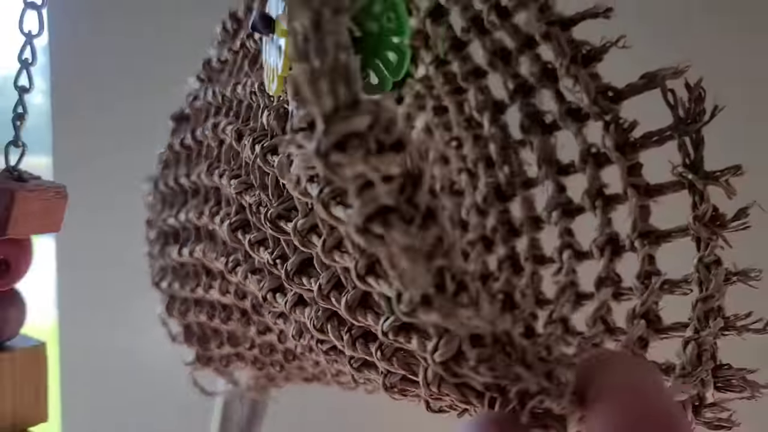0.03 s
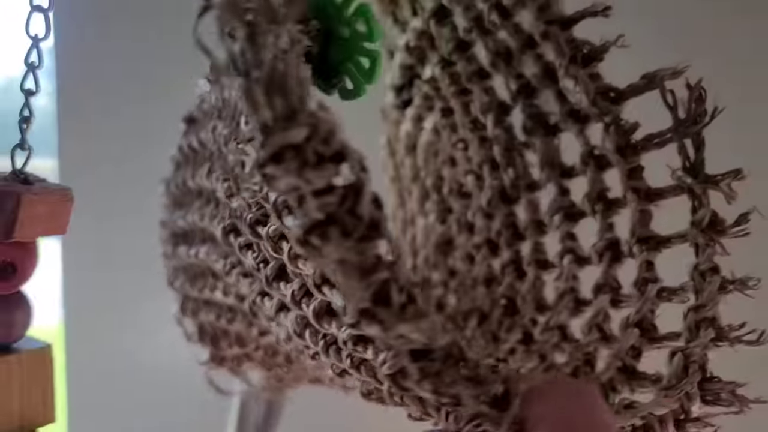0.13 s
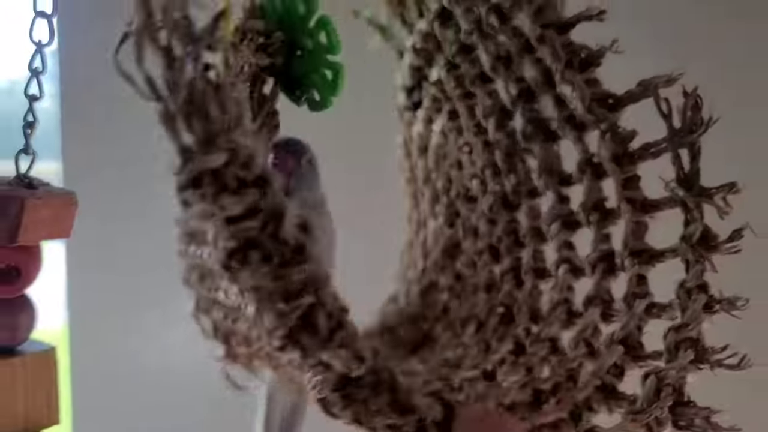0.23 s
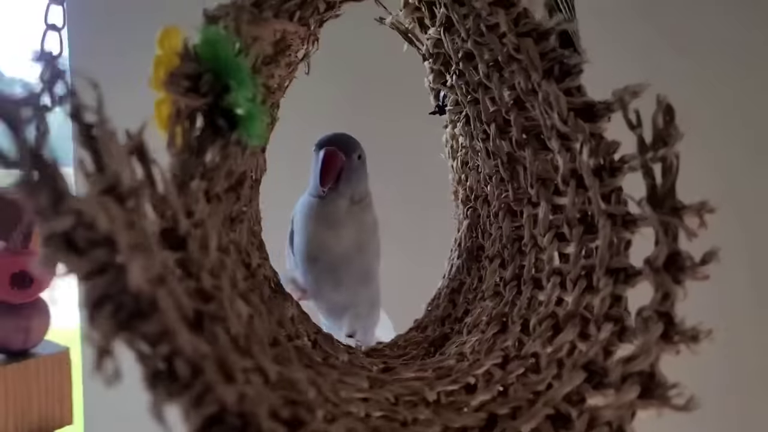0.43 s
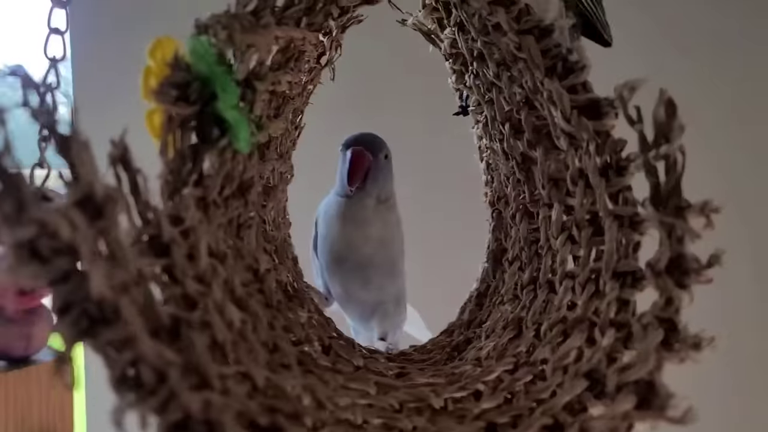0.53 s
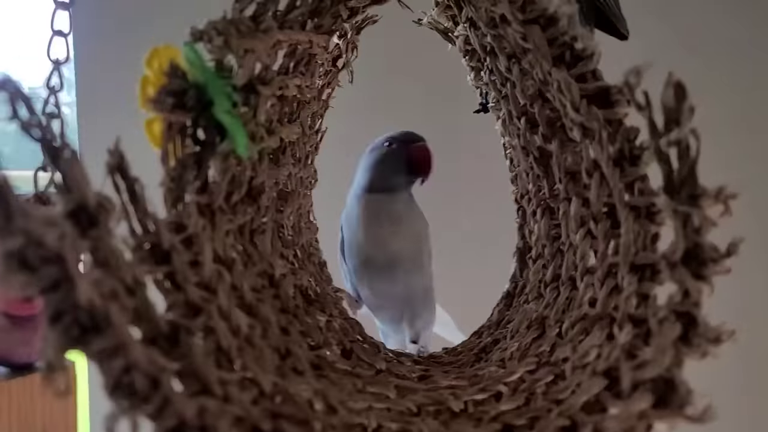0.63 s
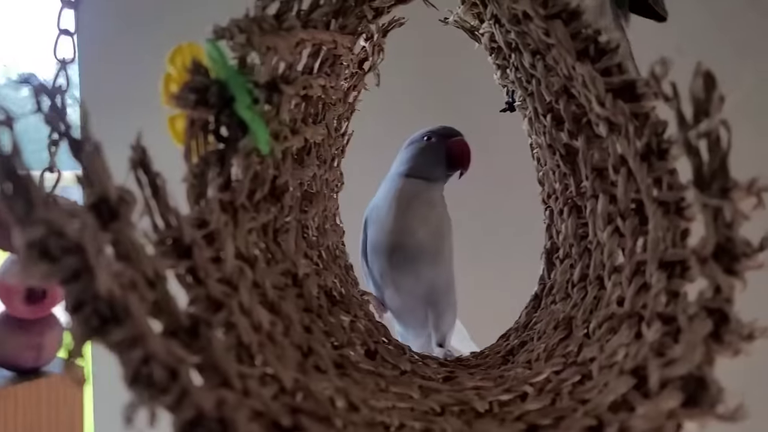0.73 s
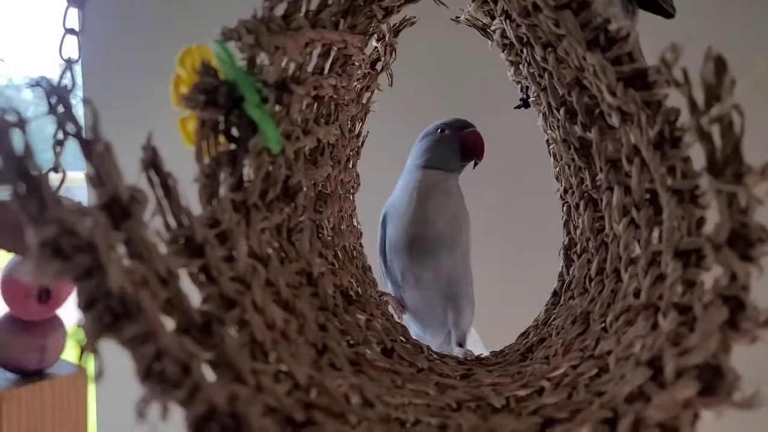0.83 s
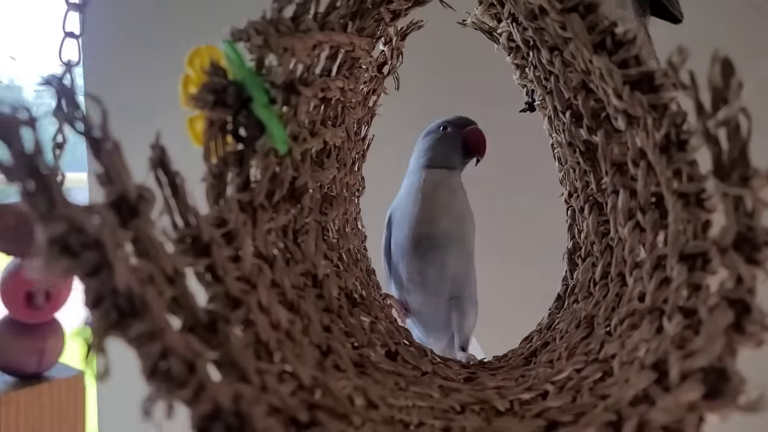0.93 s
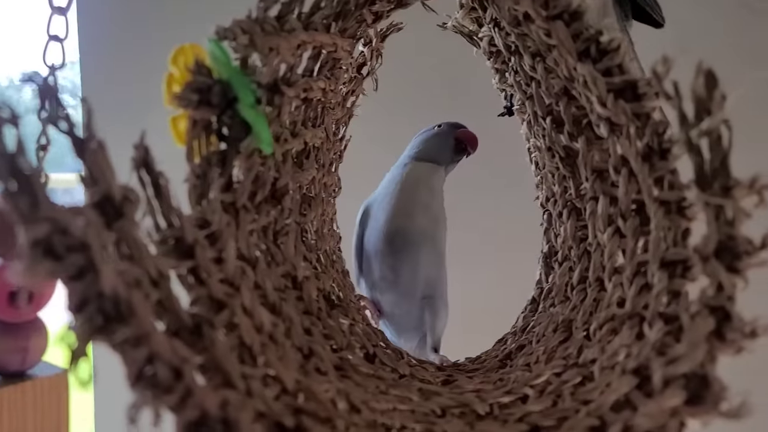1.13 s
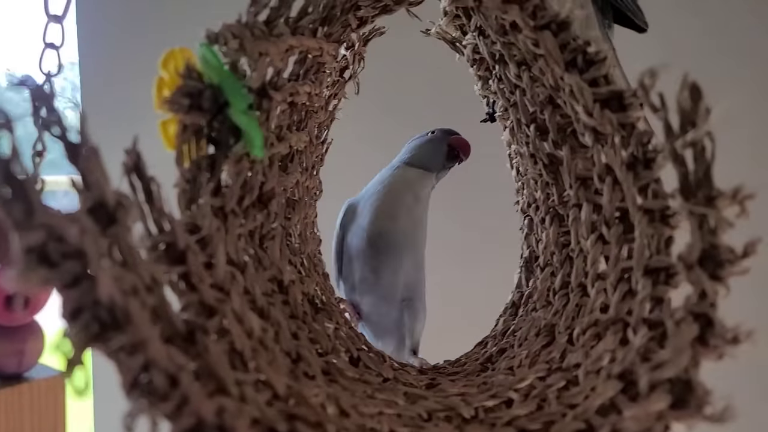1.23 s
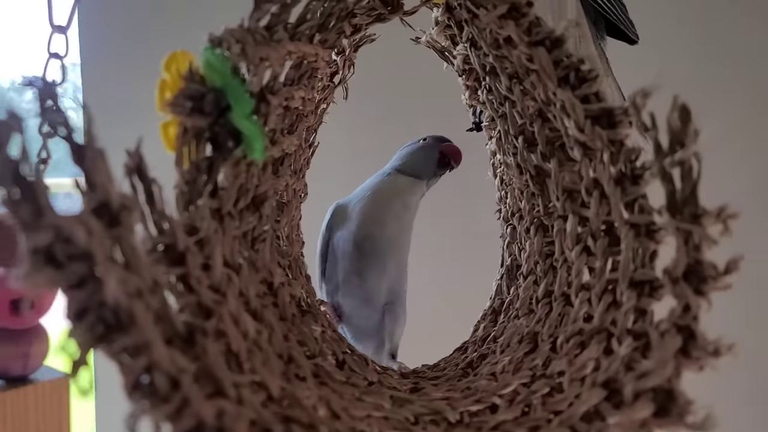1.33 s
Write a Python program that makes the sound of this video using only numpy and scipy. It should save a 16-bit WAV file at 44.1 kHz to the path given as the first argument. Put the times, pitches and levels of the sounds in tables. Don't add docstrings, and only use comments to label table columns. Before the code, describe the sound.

A parakeet squawks twice in an echoing room, first loud and harsh, then softer and lower.

```python
import sys
import numpy as np
from scipy import signal
from scipy.fft import rfft, irfft
from scipy.io import wavfile
from scipy.ndimage import uniform_filter1d

SR = 44100
rng = np.random.default_rng(int(sys.argv[2]) if len(sys.argv) > 2 else 0)


def magnitude_from_level(level_db):
    exponent = np.asarray(level_db, float) / 20
    return 10 ** exponent


def to_wav(s):
    ch = np.atleast_2d(s).T
    pcm = np.round(np.clip(ch, -1, 1) * 32767)
    wavfile.write(sys.argv[1], SR, pcm.astype(np.int16))


N = 61739

# frequency in Hz, level in dB.
STRAND_THROAT = [(1500, -28.5), (2900, 12), (4400, -35), (6000, -14.5), (9000, -52)]


def evened(x):
    return x / np.sqrt(np.mean(x ** 2) + 1e-20)


def read(points, hz):
    f, value = np.transpose(points)
    return np.interp(np.log(hz + 1), np.log(f + 1), value)


def drift(top_hz, count=1):
    hz = np.fft.rfftfreq(N, 1 / SR)
    slow = rfft(rng.standard_normal((count, N))) / (1 + (hz / top_hz) ** 4)
    return evened(irfft(slow, N))


def hum():
    tone_hz = [148.3, 296.6, 62, 81]
    # level in dB, left minus right in dB.
    tone_levels = [(-66.5, -11.5), (-83, 2.2), (-63.5, -3), (-70, -2.5)]
    waver_db, waver_hz = 2, 1.9
    t = np.arange(N) / SR
    out = np.zeros((2, N))
    for hz, (db, pan_db) in zip(tone_hz, tone_levels):
        sides_db = np.array([[pan_db / 2], [-pan_db / 2]])
        level = np.sqrt(2) * magnitude_from_level(db + waver_db * drift(waver_hz)[0] + sides_db)
        out += level * np.sin(2 * np.pi * (hz * t + rng.random()))
    return out


def noise(colour, low_hz, high_hz, patchy_db):
    # frequency in Hz, left-right likeness from -1 to 1.
    likeness = [(40, 1), (100, 0.61), (200, 0.03), (350, -0.12), (700, -0.43), (1500, -0.23), (4000, 0.05)]
    hz = np.fft.rfftfreq(4096, 1 / SR)
    a, b, c, d, patches = rng.standard_normal((N // 1024 + 5, 2049, 5)).T
    patches = uniform_filter1d(patches, size=6, axis=0)
    patches = evened(uniform_filter1d(patches, size=3, axis=1))
    same = np.clip(read(likeness, hz), -1, 1)[:, None]
    left = a + 1j * b
    right = same * left + np.sqrt(1 - same ** 2) * (c + 1j * d)
    level = magnitude_from_level(read(colour, hz)[:, None] + patchy_db * patches)
    band = ((hz > low_hz) & (hz < high_hz))[:, None]
    z = np.array([left, right]) * level * band
    return evened(signal.istft(z, nperseg=4096, noverlap=3072)[1][:, :N])


def room_floor():
    # frequency in Hz, level in dB per Hz.
    rumble_colour = [(20, -23.5), (45, -13.5), (70, -3), (110, -8.5), (160, -13), (200, -23), (400, -21.5),
                     (480, -27.5), (700, -21), (950, -38)]
    # frequency in Hz, level in dB per Hz.
    hiss_colour = [(900, -4.5), (1300, -5.5), (3800, -11.5), (7100, -11.5), (8000, -24.5), (12000, -16.5),
                   (14800, -20.5), (15700, -33)]
    rumble = magnitude_from_level(-59) * noise(rumble_colour, 15, 950, patchy_db=3.5)
    hiss = magnitude_from_level(-74.5) * noise(hiss_colour, 950, 17000, patchy_db=0.43)
    return rumble + hiss


def call(curve, throat, rasp, rasp_db, flutter):
    wobble, wobble_hz, shimmer = 0.03, 160, 0.9
    flutter_hz, flutter_bend = 258.3, -0.023
    blur_hz, breath = 380, 1.3
    throb_hz, throb_db = 35, 1
    t = np.arange(N) / SR
    s, pitch, effort_db, rough = np.transpose(curve)
    hz = np.interp(t, s, pitch)
    rough = np.clip(np.interp(t, s, rough), 0, 1)
    sway, shake, beat = drift(wobble_hz, count=3)

    flap = 2 * np.pi * np.cumsum(flutter_hz * (1 + 0.11 * beat)) / SR
    turn = 2 * np.pi * np.cumsum(hz * (1 + wobble * rough * sway)) / SR
    turn = turn + flutter_bend * flutter * np.sin(flap)
    tone = sum(magnitude_from_level(read(throat, k * hz)) * np.cos(k * turn) for k in range(1, 7))

    gusts = drift(blur_hz, count=10)
    smeared = evened(sum(gust * np.cos(k * turn) for k, gust in enumerate(gusts, 1)))
    air = smeared + breath * rng.standard_normal(N)
    air = evened(irfft(rfft(air) * magnitude_from_level(read(rasp, np.fft.rfftfreq(N, 1 / SR))), N))

    voice = np.sqrt(2) * tone * (1 + shimmer * rough * shake) + magnitude_from_level(rasp_db) * 2 * rough * air
    push = magnitude_from_level(np.interp(t, s, effort_db, -200, -200) + throb_db * drift(throb_hz)[0])
    return push * (1 + flutter * np.cos(flap)) * voice


def loud_squawk():
    # time in seconds, pitch in Hz, effort in dB, roughness 0-1.
    main = [(.19, 1400, -67.5, .6), (.215, 1599, -44, 0.71), (.252, 1700, -26.5, 0.29), (.31, 1702, -21, 0),
            (.322, 1551, -25.5, 0.42), (.334, 1538, -28, 0), (.362, 1480, -20.5, 0.23),
            (.385, 1560, -54, 0.4), (.42, 1556, -60, .6)]
    croak = [(.33, 1040, -53.5, 0.6), (.345, 1032, -34.5, .5), (.39, 1043, -43.5, 0.62),
             (.43, 1018, -37.5, 0.65), (.46, 1020, -92, 0.3)]
    yelp = [(.203, 1855, -61.5, 0.77), (.212, 1741, -34.5, 0), (.225, 1561, -39, 0.3),
            (.24, 1542, -43.5, .4), (.255, 1750, -81, 0.1)]
    strand = [(.27, 1616, -61.5, 0.54), (.295, 1580, -28.5, 0.36), (.315, 1526, -35.5, 0),
              (.33, 1439, -43, .3), (.37, 1424, -43, 0.36), (.4, 1296, -71, .4)]
    # frequency in Hz, level in dB.
    main_throat = [(1000, -70), (1600, -46.5), (3200, 0), (3450, -8.5), (4600, -49.5), (5100, -43.5),
                   (6500, -26), (10000, -45.5)]
    croak_throat = [(1000, -69), (2100, -7.5), (3100, -19.5), (4200, -5), (5200, -17.5), (6200, -11.5),
                    (7500, -38.5), (10000, -55)]
    yelp_throat = [(1300, -6.5), (1650, -5.5), (3200, -32), (5000, -6.5), (6500, -24.5), (10000, -50)]
    rasp_colour = [(1150, -38), (1400, -18), (2300, 0), (3200, -4), (4600, -10), (6300, -18.5),
                   (9600, -18.5), (11500, -37.5)]
    parts = [(main, main_throat), (croak, croak_throat), (yelp, yelp_throat), (strand, STRAND_THROAT)]
    return sum(call(curve, throat, rasp_colour, rasp_db=-7, flutter=0.41) for curve, throat in parts)


def ticks():
    # start in seconds, peak in dB, pitch scale, ring in seconds (time to fall 20 dB).
    snaps = [(.4568, -33, 1., .0013), (.624, -46, 1.1, .0009), (.662, -54, .95, .002),
             (1.109, -64, .8, .0009), (1.157, -66, .9, .0008), (1.184, -64, .65, .001),
             (1.2752, -59, .5, .0015), (1.278, -57, .35, .0035), (1.2845, -63, .38, .0015),
             (1.292, -66, .35, .002), (1.318, -66, .35, .0025)]
    # frequency in Hz, level in dB.
    straw_modes = [(3000, -14), (5800, -5), (9000, 0), (12000, -2), (14300, -7)]
    out = np.zeros(N + 600)
    t = np.arange(600) / SR
    for s, db, scale, ring in snaps:
        snap = np.zeros(600)
        for hz, mode_db in straw_modes:
            snap += magnitude_from_level(mode_db) * np.sin(2 * np.pi * np.minimum(hz * scale, SR / 3) * t)
        out[round(s * SR):][:600] += magnitude_from_level(db - 20 * t / ring) * snap
    return out[:N]


def soft_squawk():
    # time in seconds, pitch in Hz, effort in dB, roughness 0-1.
    main = [(.54, 1290, -46, 0.28), (.585, 1345, -45, .3), (.635, 1384, -43, 0.31), (.7, 1362, -42.5, 0.41),
            (.775, 1365, -43, 0.42), (.79, 1172, -41.5, 0.3), (.82, 1224, -41.5, .3),
            (.86, 1162, -40.5, 0.24), (.9, 1141, -57.5, 0.44)]
    strand = [(.59, 1471, -102, 0.22), (.62, 1437, -51, 0.23), (.7, 1474, -59, 0.067),
              (.76, 1477, -56.5, 0.15), (.79, 1570, -82.5, .3)]
    # frequency in Hz, level in dB.
    main_throat = [(900, -43.5), (1350, -13.5), (2300, -10.5), (2750, 1.5), (3550, -2), (4100, -10),
                   (4750, -17), (5500, -40)]
    rasp_colour = [(1000, -58), (1300, -41), (1850, -25.5), (2700, -3.5), (4900, -16), (6600, -10),
                   (9600, -21.5), (10600, -32)]
    parts = [(main, main_throat), (strand, STRAND_THROAT)]
    return sum(call(curve, throat, rasp_colour, rasp_db=-6, flutter=0.19) for curve, throat in parts)


def room(x):
    # frequency in Hz, time to fall 60 dB in seconds.
    decay = [(1000, 0.72), (2000, 0.5), (3500, 0.62), (6000, 0.56), (12000, 0.39)]
    taps = np.zeros((2, SR))
    at = np.arange(200, SR - 20, 20) + rng.integers(0, 20, (2, (SR - 201) // 20))
    np.put_along_axis(taps, at, rng.choice([-1., 1.], at.shape), 1)
    hz, t, z = signal.stft(taps, SR, nperseg=256)
    fading = z * magnitude_from_level(-60 * t / read(decay, hz)[:, None])
    tail = signal.istft(fading, SR, nperseg=256)[1]
    return signal.fftconvolve(x[None], tail / np.linalg.norm(tail[0]), axes=1)[:, :N]


def scene():
    direct_db, wet_db, tick_wet_db = -4, -0.5, -7
    bird_pan_db, tick_pan_db = -1.5, 3
    lag_s = 0.0003
    bird = loud_squawk() + soft_squawk()
    snap = ticks()
    direct = magnitude_from_level(direct_db) * np.array([bird, np.roll(bird, round(lag_s * SR))])
    echoes = room(magnitude_from_level(wet_db) * bird + magnitude_from_level(tick_wet_db) * snap)
    far = (direct + echoes) * magnitude_from_level([[bird_pan_db / 2], [-bird_pan_db / 2]])
    close = np.array([snap, np.roll(snap, 2)]) * magnitude_from_level([[tick_pan_db / 2], [-tick_pan_db / 2]])
    return far + close + hum() + room_floor()


def top_cut(x):
    return signal.sosfilt(signal.butter(12, 15710, fs=SR, output="sos"), x)


def record(dry):
    low_pass = signal.firwin(511, 15750, window=("kaiser", 9), fs=SR)
    mix = signal.oaconvolve(dry, low_pass[None], "same")
    return top_cut(mix)


dry = scene()
out = record(dry)
to_wav(out)
```